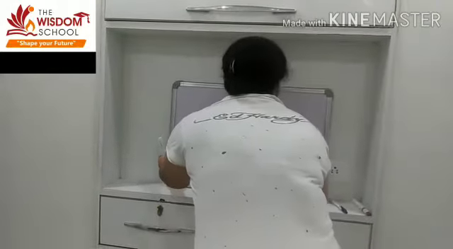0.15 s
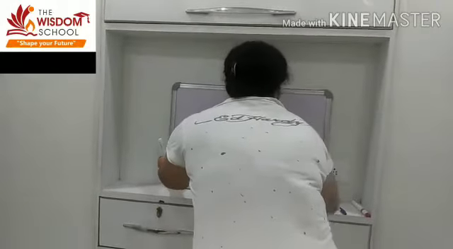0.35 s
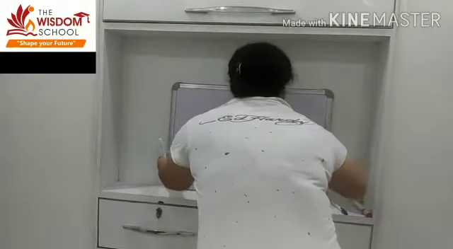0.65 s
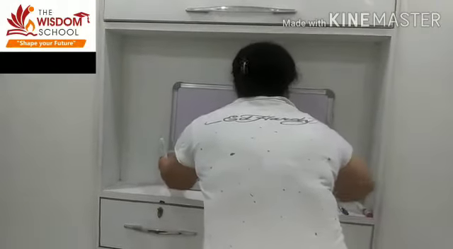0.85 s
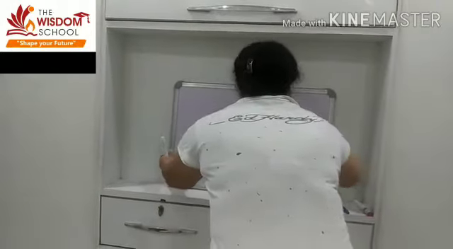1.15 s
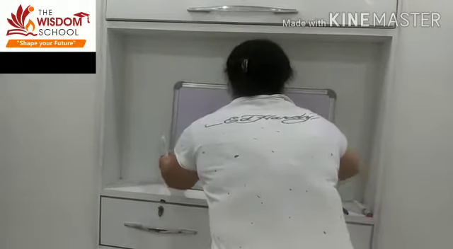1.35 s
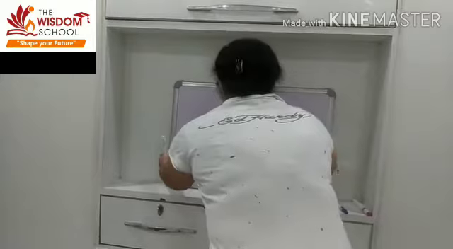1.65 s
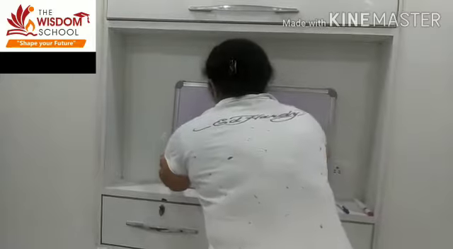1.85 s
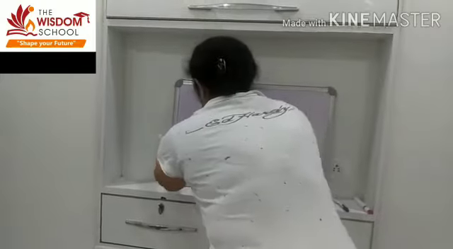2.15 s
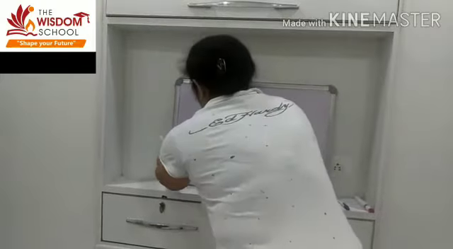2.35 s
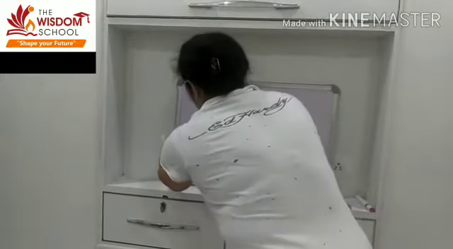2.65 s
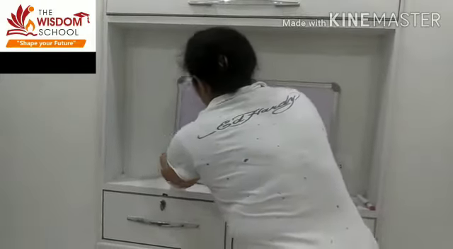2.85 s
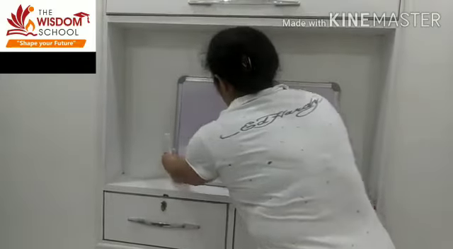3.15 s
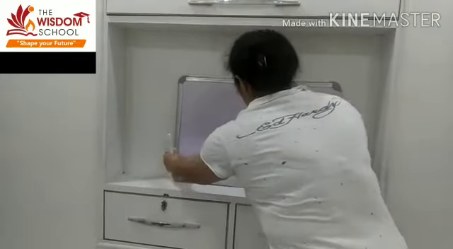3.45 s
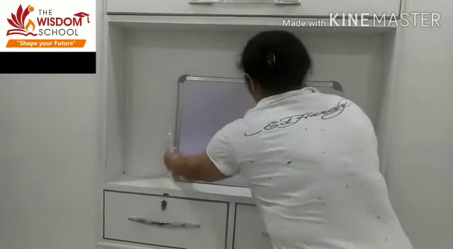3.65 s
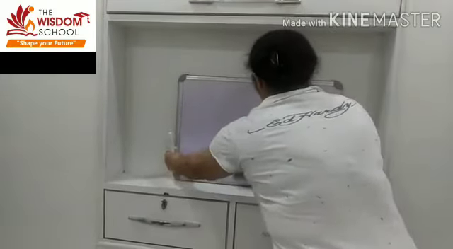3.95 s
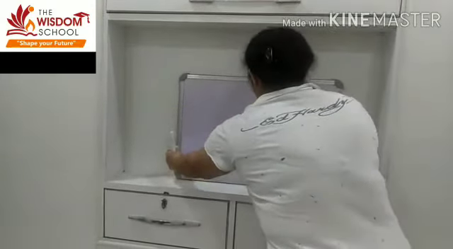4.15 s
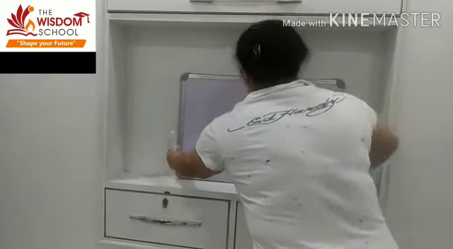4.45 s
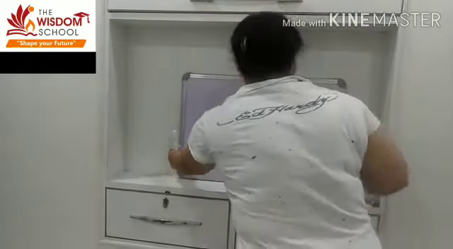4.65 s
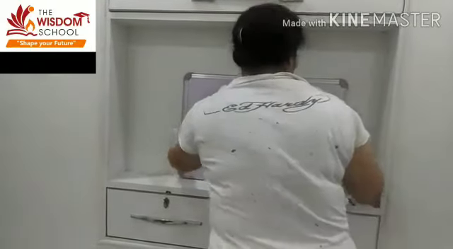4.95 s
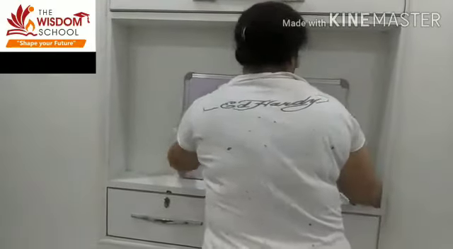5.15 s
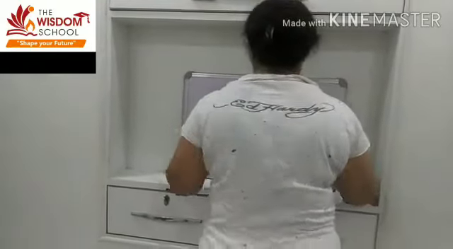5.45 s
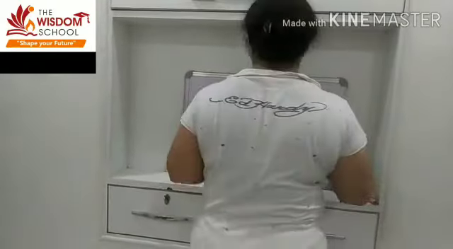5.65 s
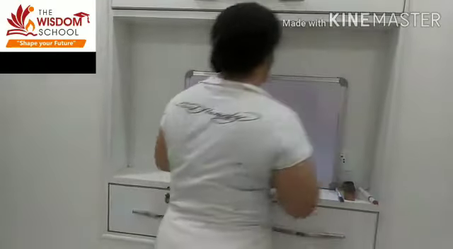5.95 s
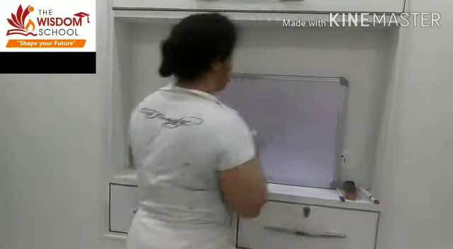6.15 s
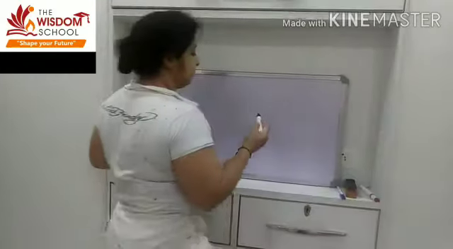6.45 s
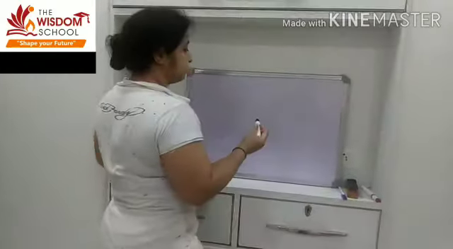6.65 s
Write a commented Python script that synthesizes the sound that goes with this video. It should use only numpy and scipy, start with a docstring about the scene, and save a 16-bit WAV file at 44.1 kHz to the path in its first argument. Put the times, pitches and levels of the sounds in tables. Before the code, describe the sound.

Quick soft rubbing on a board with dull thumps, two bursts of loud woody knocks, then cloth rustle and small taps over faint hum.

```python
"""A felt duster wipes a whiteboard on a wooden shelf in a small hard room: shaped noise follows the strokes.
The duster knocks on the board's frame and blows ring the shelf: each blow is a thump, ringing modes and a tick.
The board's edge chatters and drags on the shelf, and a sleeve rustles: short swells of coloured noise. A fan
hums faintly as a wavering tone over steady air, and a low draught comes in gusts. A phone with two ports hears
it all, and adds a faint hiss."""
import sys
import numpy as np
from scipy import signal
from scipy.fft import rfft, irfft, next_fast_len
from scipy.io import wavfile
from scipy.ndimage import uniform_filter1d

SR = 44100
rng = np.random.default_rng(int(sys.argv[2]) if len(sys.argv) > 2 else 0)


def master(y):
    """Save y as 16-bit WAV."""
    cut = np.clip(np.atleast_2d(y).T, -1, 1)
    pcm = np.round(cut * 32767)  # scale
    wavfile.write(sys.argv[1], SR, pcm.astype(np.int16))


N = 298991
T = np.arange(N) / SR  # time in seconds
RING = int(0.6 * SR)  # longest ring of one blow, in samples
PORT_LAG_S = 0.00045  # time sound takes between the two ports
SHELF_T60_S, ROOM_T60_S = 0.38, 0.38  # time to fade by 60 dB

# the tones the shelf rings at: pitch_hz [Hz], level_db [dB], t60_s [s to fade by 60 dB]
SHELF_RING_TONES = [(187,-12,.28), (313,-6,.3), (336,-5,.54), (391,-5,.33), (485,-7,.32), (668,-2,.3),
                    (704,2,.38), (738,0,.35), (838,-3,.3), (1180,-2,.38), (1222,-1,.3), (1265,2,.38),
                    (1301,0,.36), (1381,-4,.28), (1415,-2,.34), (1510,-7,.28), (1890,-8,.35), (2037,-9,.32),
                    (2154,-10,.4), (2594,-13,.35), (3047,-13,.3), (3171,-7,.33), (3280,-12,.28),
                    (4950,-14,.25), (5066,-14,.28)]
# colour of the shelf's clatter: pitch_hz [Hz], level_db [dB]
SHELF_COLOUR = [(200,-18.5), (320,-1.5), (430,-12.5), (560,-6), (720,-0.5), (930,-7.5), (1330,3.5),
                (1650,-5.5), (2000,-3.5), (2400,-9.5), (2800,-13), (4500,-20.5)]
# colour of a low thump or groan: pitch_hz [Hz], level_db [dB]
THUMP_COLOUR = [(88,-37.5), (108,1), (126,7.5), (185,2), (280,-10.5)]


def undb(db):
    """Decibels to gain."""
    return 10 ** (np.asarray(db) / 20)


def unit(x, count=None):
    """Scale to rms 1 over the first count samples."""
    return x / np.sqrt(np.mean(x[..., :count] ** 2))


def shape(x, gain):
    """Filter by a function of frequency."""
    size = next_fast_len(x.shape[-1] + 4096)
    f = np.fft.rfftfreq(size, 1 / SR) + 0.00088  # never zero, so its logarithm exists
    return irfft(rfft(x, size) * gain(f), size)[..., :x.shape[-1]]


def colour(x, points):
    """Filter through (Hz, dB) points without ringing ahead of the sound, falling steeply outside them."""
    hz, db = np.transpose(points)
    f = np.fft.rfftfreq(8192, 1 / SR) + 1
    octaves_outside = np.abs(np.log2(f / np.clip(f, hz.min(), hz.max())))
    gain_db = np.interp(np.log(f), np.log(hz), db) - 18 * octaves_outside
    # folding the cepstrum (spectrum of the log gain) gives a response that starts at once
    cepstrum = irfft(np.log(undb(gain_db)))
    fold = np.r_[1, np.full(4095, 2), np.zeros(4096)]
    response = irfft(np.exp(rfft(cepstrum * fold)))
    return signal.fftconvolve(x, response[None], axes=1)[:, :x.shape[1]]


def diffuse(size):
    """Noise from all sides: alike at both ports in the bass, unrelated in the treble."""
    f = np.fft.rfftfreq(2 * next_fast_len(size // 2 + 1), 1 / SR)
    likeness = 0.99 * np.sinc(2 * f * PORT_LAG_S)
    noise = rng.standard_normal((2, 2 * len(f))).view(complex)
    mid, side = irfft(noise * np.sqrt([1 + likeness, 1 - likeness]))[:, :size]
    return unit(np.array([mid + side, mid - side]))


def walk(rate):
    """Random wandering with a spread near 1, drawn at rate points a second and joined by straight lines."""
    knots = rng.standard_normal(N // 20)
    return 1.2 * np.interp(T * rate, np.arange(len(knots)), knots)


def add(out, s, sound):
    """Mix a sound in at time s."""
    start = max(int(s * SR), 0)
    out[:, start:start + RING] += sound[:, :N - start]


def swell(s, length):
    """A rub that builds and dies away, held briefly by the room."""
    rub = np.exp(-(2 * (T - s) / length) ** 2)
    room_tail = 0.76 * (T > s) * np.exp(-np.log(1000) * np.abs(T - s) / ROOM_T60_S)
    return np.maximum(rub, room_tail)


def frame(x, ring_s=0.009):
    """The light frame adds many short, close resonances."""
    t = np.arange(2048) / SR
    response = rng.standard_normal(len(t)) * np.exp(-t / ring_s)
    response = response[None] / np.linalg.norm(response)
    return x + signal.fftconvolve(x, response, axes=1)[:, :x.shape[1]]


def echoes(t60, build_s, sparse_s):
    """One click in the room: single reflections at first, thickening into a smooth tail."""
    t = np.arange(RING) / SR
    density = np.clip((t / sparse_s) ** 2, 0.02, 1)
    # rarer arrivals are stronger, so the average power does not depend on the density
    arrivals = (rng.random(RING) < density) / np.sqrt(density)
    build = 1 - 0.21 * np.exp(-t / build_s)
    return diffuse(RING) * arrivals * build * np.exp(-np.log(1000) * t / t60)


def ring(modes, build_s):
    """Decaying tones of random strength; higher ones reach the two ports more out of step, up to a limit."""
    strike_spread_db = 1.2
    t = np.arange(RING) / SR
    out = np.zeros((2, RING))
    for hz, db, t60 in modes:
        phase = 2 * np.pi * rng.random()
        skew = rng.choice([-1, 1]) * min(np.pi * hz * PORT_LAG_S / 2, np.pi / 4)
        strength = undb(db + strike_spread_db * rng.standard_normal())
        tone = np.sin(2 * np.pi * hz * t + phase + np.array([[skew], [-skew]]))
        out += strength * tone * np.exp(-np.log(1000) * t / t60)
    return out * (1 - np.exp(-t / build_s))


def knocks(rows, modes, body, tick, t60, sparse_s, body_db, thump_db, thump_db_per_octave, tick_db, order):
    """Each blow thumps the panel, rings its modes and ticks; a harder contact thumps less and ticks more."""
    ordinary_contact_hz, tick_db_per_octave = 2000, 4.5
    panel_low_hz = 100  # the panels radiate no deep bass
    out = np.zeros((2, N))

    def attack(x):
        return unit(x, count=1800)  # level set by the first 41 ms

    for s, level_db, contact_hz, modes_db in rows:
        clatter = attack(colour(echoes(t60, 0.035, sparse_s), body))
        panel = clatter + undb(modes_db) * attack(ring(modes, 0.0006))
        # a soft contact lasts longer and cannot drive the high modes
        contact = signal.butter(order, min(contact_hz, SR / 3), fs=SR, output="sos")
        panel = attack(signal.sosfilt(contact, panel))
        hardness = np.log2(contact_hz / ordinary_contact_hz)  # octaves
        thump = attack(colour(echoes(0.37, 0.0084, 0.0095), THUMP_COLOUR))
        thump = undb(thump_db + thump_db_per_octave * hardness) * thump
        click = attack(colour(frame(echoes(ROOM_T60_S, 0.0059, 0.019)), tick))
        click = undb(tick_db + tick_db_per_octave * hardness) * click
        add(out, s, undb(level_db) * (undb(body_db) * panel + thump + click))
    bass_cut = signal.butter(4, panel_low_hz, "highpass", fs=SR, output="sos")
    return signal.sosfilt(bass_cut, out)


def duster():
    """Felt hisses with the speed of the hand, which slows at every turn; the board murmurs under pressure."""
    # bouts of even to-and-fro wiping: start_s [s], end_s [s], strokes [count], level_db [dB]
    wipe_bouts = [(0.11, 1.14, 5, -45.5), (1.157, 2.02, 4, -45), (2.028, 2.472, 2, -46),
                  (2.443, 3.732, 5, -46), (4.042, 4.376, 1, -46.5), (4.598, 5.155, 3, -45)]
    # how strongly the rubbed board murmurs: time_s [s], level_db [dB]
    murmur_levels = [(1.2, -13), (1.65, -10.5), (2.0, -15.5), (2.4, -20.5), (4.0, -17.5)]
    # colour of the felt's hiss: pitch_hz [Hz], level_db [dB]
    felt_colour = [(530, -42.5), (900, -24), (1080, -3), (1450, -10), (2020, -0.5), (2390, -2),
                   (2660, -3.5), (7590, -1), (15500, -9)]
    murmur_colour = [(250, -18), (350, -12), (385, 0), (425, -14), (478, -8), (540, -19), (1000, -25)]
    turn_speed = 0.37  # hand speed left at the turn of a stroke

    rub = np.zeros(N)
    for start, end, strokes, db in wipe_bouts:
        swing = np.sin(np.pi * round(strokes) * (T - start) / (end - start))
        during = (T > start) * (T < end)
        rub = np.maximum(rub, undb(db) * np.hypot(swing, turn_speed) * during)
    rub = uniform_filter1d(rub, size=2000)
    fibres = unit(colour(diffuse(N), felt_colour)) * undb(1.0 * walk(98))
    # two low panel modes carry the murmur
    murmur = unit(colour(diffuse(N), murmur_colour))
    pressure_db = np.interp(T, *np.transpose(murmur_levels))
    return rub * (undb(-9.5) * fibres + undb(pressure_db) * murmur)


def board_knocks():
    """The duster knocks against the board's frame, and the board rings at its own modes."""
    # blows: start_s [s], level_db [dB], contact_hz [Hz, cut-off; higher is harder]
    blows = [(0.0,-32.5,2570), (0.076,-39.5,605), (0.149,-35.5,940), (0.225,-45.5,626), (0.267,-50,606),
             (0.63,-23,2450), (0.637,-19.5,2760), (0.675,-37.5,2390), (1.061,-18,3030), (1.072,-19.5,3070),
             (1.108,-34,2200), (1.438,-27,1800), (3.273,-34,1250), (4.25,-37.5,810), (4.727,-29.5,1520),
             (5.156,-29,760), (5.191,-32,400), (6.367,-47.5,500), (6.673,-35,1380), (6.695,-33,450),
             (6.761,-31,940)]
    # the tones the board rings at: pitch_hz [Hz], level_db [dB], t60_s [s to fade by 60 dB]
    board_ring_tones = [(128.2,-0.5,0.28), (177.2,4,0.13), (388.4,-2,0.18), (582,-5.5,0.45), (858,-5.5,.31),
                        (1025,-7,0.46), (1184,-5,.35), (1490,-9.5,0.49), (1665,-17.5,0.82),
                        (1910,-8.5,0.37), (2370,-14,.3), (2640,-22.5,.25)]
    # colours of the board's clatter and of its tick: pitch_hz [Hz], level_db [dB]
    clatter_colour = [(200,-6.5), (280,-7), (380,-7), (490,-6.5), (580,-4.5), (780,-13.5), (970,-6),
                      (1370,-12), (1700,-14), (2400,-17.5), (3100,-36.5)]
    tick_colour = [(1800, 1), (3000, -0.5), (5000, -5.5), (8000, -4.5), (11000, -7.5), (15000, -14.5)]
    ring_db = -2  # ringing against clatter
    rows = [(*blow, ring_db) for blow in blows]
    return knocks(rows, board_ring_tones, clatter_colour, tick_colour, t60=0.38, sparse_s=0.05,
                  body_db=-6.0, thump_db=-23.5, thump_db_per_octave=-7.5, tick_db=-18.5, order=3)


def shelf_knocks():
    """Board and duster knock on the wooden shelf and make it ring."""
    # blows: start_s [s], level_db [dB], contact_hz [Hz, cut-off], ring_db [dB against the clatter]
    blows = [(3.678,-10,2400,-8), (3.684,-14.5,930,2.5), (3.691,-11,2300,-3), (5.053,-31.5,956,-6.5),
             (5.322,-32,1900,-2), (5.357,-16,1880,5.5), (5.377,-27.5,1650,-5.5), (5.445,-21.5,5300,-4),
             (5.452,-10,5530,-2), (5.468,-17,5360,-1.5), (5.498,-20.5,805,5.5), (5.88,-36.5,310,-10)]
    # colour of the tick: pitch_hz [Hz], level_db [dB]
    tick_colour = [(3000,7), (4400,10), (5300,2.5), (7500,-1), (11000,-9.5), (15000,-23.5)]
    return knocks(blows, SHELF_RING_TONES, SHELF_COLOUR, tick_colour, t60=SHELF_T60_S, sparse_s=0.04,
                  body_db=-6.5, thump_db=-35.5, thump_db_per_octave=-6.5, tick_db=-29.5, order=7)


def slides():
    """The board's edge chatters along the shelf and keeps its modes ringing."""
    # chatters: middle_s [s], length_s [s], level_db [dB]
    chatters = [(5.26,0.1,-43.5), (5.335,.035,-36.5), (5.41,0.066,-32), (5.442,0.013,-17)]
    force = sum(undb(db) * np.exp(-(2 * (T - s) / length) ** 2) for s, length, db in chatters)
    chatter = force * rng.standard_normal(N) * undb(3.5 * walk(200))
    clatter = unit(colour(echoes(SHELF_T60_S, 0.035, 0.02), SHELF_COLOUR))
    wood = unit(ring(SHELF_RING_TONES, 0.0006)) + clatter
    wood = colour(wood, [(300, -13.5), (750, 2), (1400, -3.5), (4500, 1)])
    return signal.fftconvolve(chatter[None], unit(wood) / np.sqrt(RING), axes=1)[:, :N]


def drags():
    """The frame sticks and slips on the shelf: a slow slip groans, a quicker one rasps, a fast one hisses."""
    # drags: middle_s [s], length_s [s], level_db [dB], slip_speed [0 to 1]
    drag_rows = [(0.031,0.14,-46.5,0.71), (0.09,0.39,-42,0.37), (3.08,0.073,-45.5,0.21),
                 (3.177,0.1,-45,0.01), (3.245,0.19,-43.5,0.35), (4.258,0.045,-38,0.35),
                 (5.194,0.18,-42,0.49), (5.431,0.16,-31,0.4)]
    # colour of the rasp: pitch_hz [Hz], level_db [dB]
    rasp_colour = [(120, -30.5), (200, -6), (231, 4), (460, 5), (531, -4), (613, 3), (860, -5), (1570, -13),
                   (2260, -27), (4500, -24.5), (5850, -50.5), (9900, -120)]
    hiss_colour = [(1400, -1.5), (2600, -7.5), (4500, -10.5), (6800, -10.5), (11000, -16.5), (15000, -22.0)]
    # slip speeds at which each is strongest
    groan_speed, rasp_speed, hiss_speed, speed_spread = 0.046, 0.55, 0.66, 0.27

    slips = diffuse(N) * undb(2.0 * walk(130))
    groan = unit(colour(slips, THUMP_COLOUR))
    rasp = unit(colour(slips, rasp_colour))
    hiss = unit(colour(frame(slips), hiss_colour))
    out = np.zeros((2, N))
    for s, length, db, speed in drag_rows:
        def share(best):
            return np.exp(-((speed - best) / speed_spread) ** 2)

        mix = share(groan_speed) * groan + share(rasp_speed) * rasp + share(hiss_speed) * hiss
        out += undb(db) * swell(s, length) * mix
    return out


def sleeve():
    """Cotton slides over cotton as the arm moves; each scuff is brightest around its own pitch."""
    # scuffs: middle_s [s], length_s [s], level_db [dB], pitch_hz [Hz]
    scuff_rows = [(0.045,0.07,-36.5,2380), (0.033,0.024,-44.5,6500), (0.125,0.25,-53,2430),
                  (4.274,0.056,-40,5530), (5.202,0.15,-43,9000), (5.945,.13,-48,744),
                  (6.039,0.07,-44.5,2660), (6.142,0.097,-45,5930), (6.232,0.12,-51.5,6000),
                  (6.387,0.2,-46.5,8200)]
    # colour of the cloth: pitch_hz [Hz], level_db [dB]
    cloth_colour = [(240, 4), (400, -7), (577, -1), (623, -1.5), (1320, -1.5), (2710, 2), (4030, -4.5),
                    (7440, -7), (13900, -11.5), (15500, -10)]
    threads = colour(diffuse(N) * undb(1.0 * walk(150)), cloth_colour)
    out = np.zeros((2, N))
    for s, length, db, hz in scuff_rows:
        scuff = shape(threads, lambda f: 1 + 1.55 * np.exp(-(np.log2(f / hz) / 0.86) ** 2))
        out += undb(db) * swell(s, length) * unit(scuff)
    return out


def fan():
    """A hum wavering in pitch and level, with a narrow noisy drone, over the steady air of the room."""
    # colour of the room's air: pitch_hz [Hz], level_db [dB]
    air_colour = [(29, -20.5), (50, -5), (87, -6.5), (162, 0), (288, -13), (809, -18), (2170, -20),
                  (4240, -22), (4670, -37.5), (6850, -22.5), (8300, -24.5), (15500, -42.5)]
    hum_waver_db = 3.5
    hum_hz = 154 + 4 * walk(21)
    hum = np.sin(2 * np.pi * np.cumsum(hum_hz) / SR) * undb(hum_waver_db * walk(16))
    drone = unit(colour(diffuse(N), [(100, -21.0), (125, -11), (155, 11.5), (185, -14.0), (240, -11)]))
    air = unit(colour(diffuse(N), air_colour))
    return undb(-60) * hum + undb(-58.5) * drone + undb(-57) * air


def draught():
    """A low rumble of air, partly different at each port; it swells in gusts."""
    # gusts: middle_s [s], length_s [s], level_db [dB]
    gust_rows = [(0.76,0.18,-57), (3.19,0.16,-46.5), (3.345,0.17,-49.5)]
    steady_db = -60
    gust = undb(steady_db) + sum(undb(db) * swell(s, length) for s, length, db in gust_rows)
    air = diffuse(N) + 0.7 * rng.standard_normal((2, N))
    return gust * unit(colour(air, [(22, -9), (36, 0), (46, -4), (62, -18), (110, -28)]))


def scene():
    """All sources at the two ports; the left one hears more treble."""
    # left port over right port: pitch_hz [Hz], level_db [dB]
    port_tilt = [(150, 1), (700, 0), (1400, 3), (3200, 2.5), (6000, 6.5), (9000, 10.5), (14000, 3)]
    wiping = duster()
    blows = board_knocks() + shelf_knocks()
    rubbing = slides() + drags() + sleeve()
    left, right = wiping + blows + rubbing + fan() + draught()
    hz, db = np.transpose(port_tilt)

    def tilt(f):
        return undb(np.interp(np.log(f), np.log(hz), db) / 2)  # half to each port

    return np.array([shape(left, tilt), shape(right, lambda f: 1 / tilt(f))])


def record(dry):
    """The phone adds its own faint hiss and cuts the top."""
    top_hz = 15550
    hiss = undb(-61.5) * rng.standard_normal(dry.shape)
    top_cut = signal.ellip(10, 0.2, 80, top_hz, fs=SR, output="sos")
    return signal.sosfilt(top_cut, dry + hiss)


dry = scene()
out = record(dry)
master(out)
```